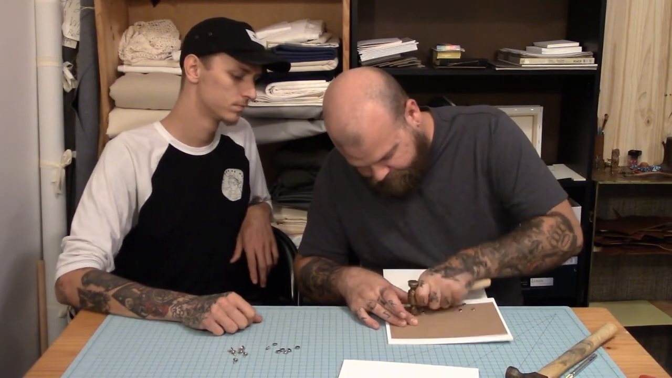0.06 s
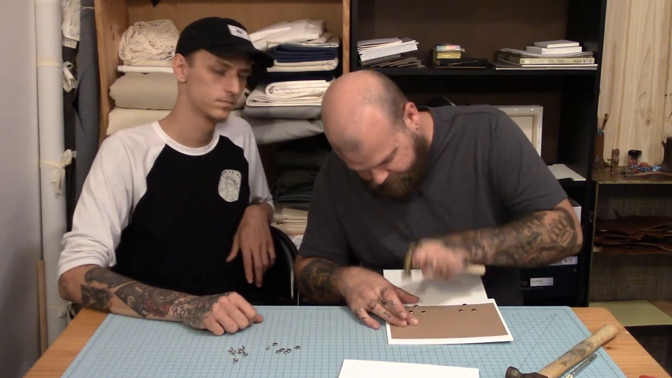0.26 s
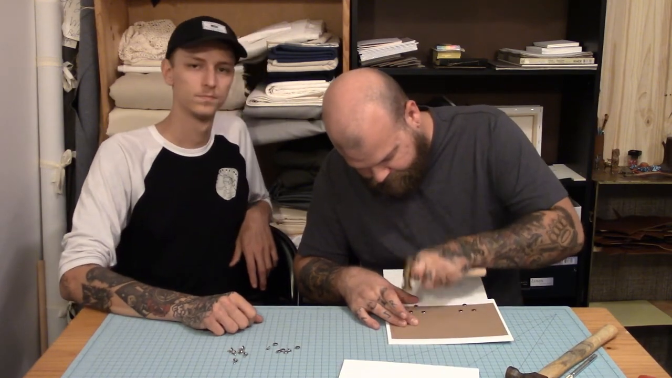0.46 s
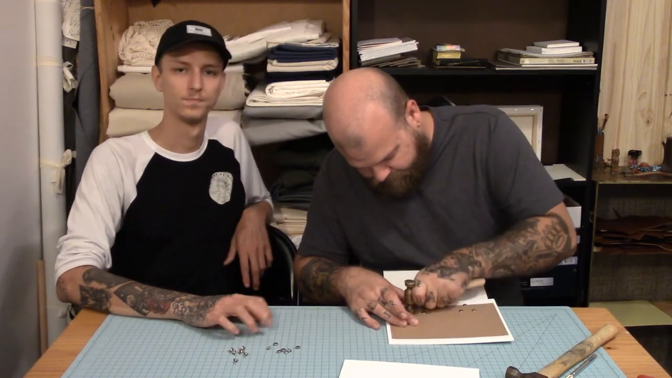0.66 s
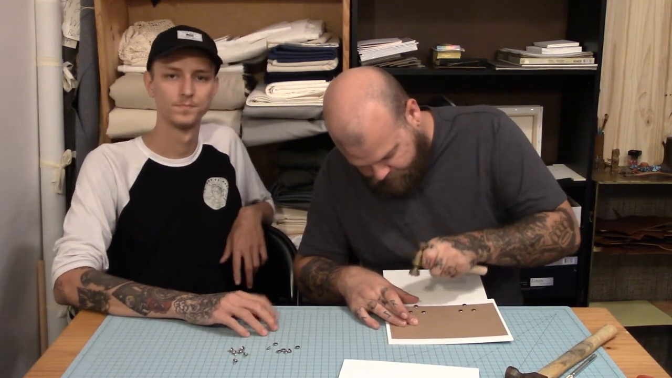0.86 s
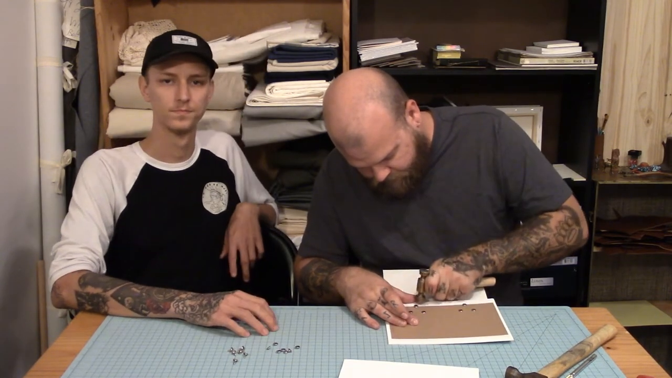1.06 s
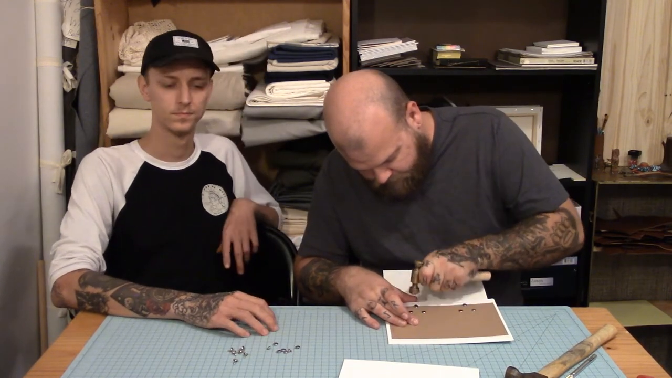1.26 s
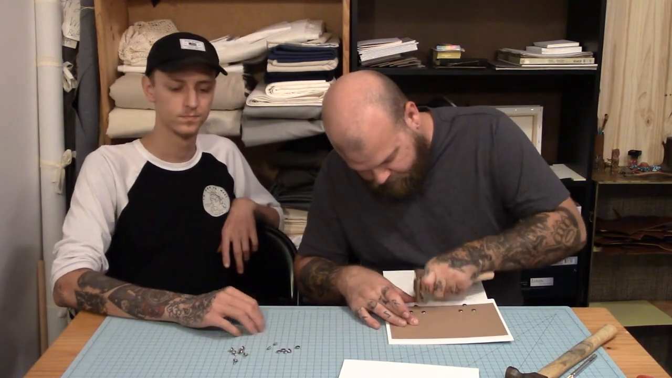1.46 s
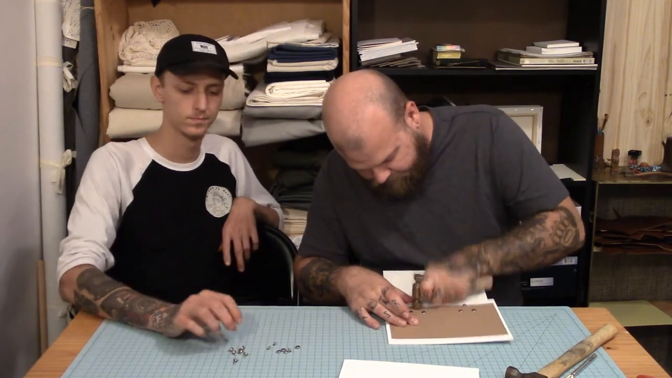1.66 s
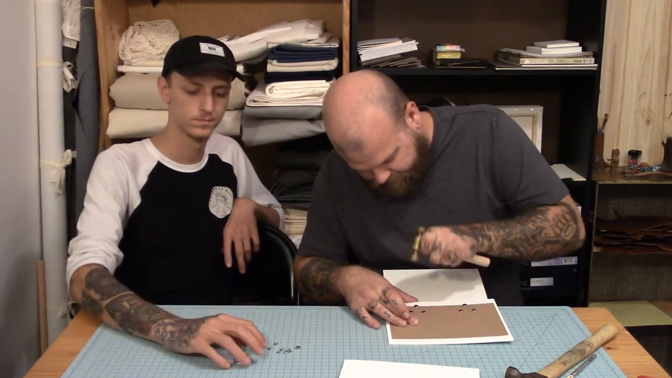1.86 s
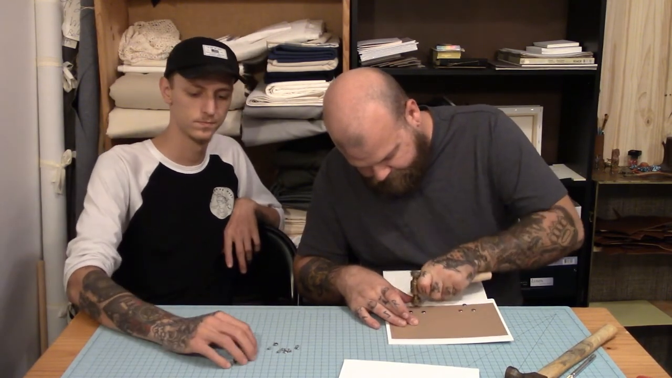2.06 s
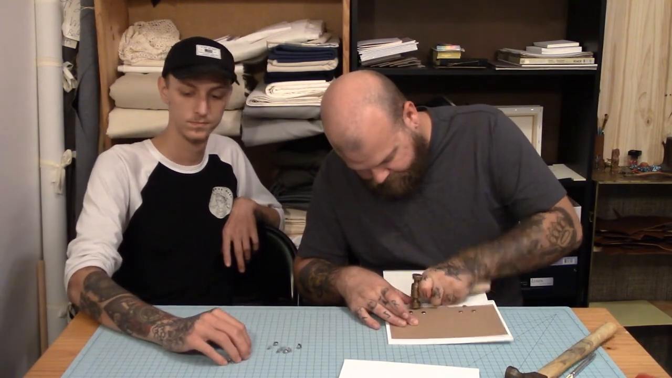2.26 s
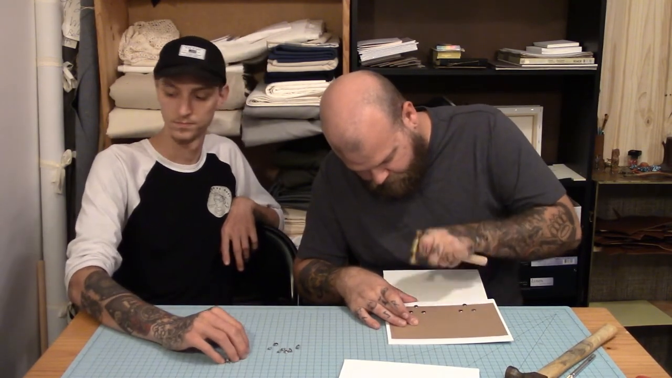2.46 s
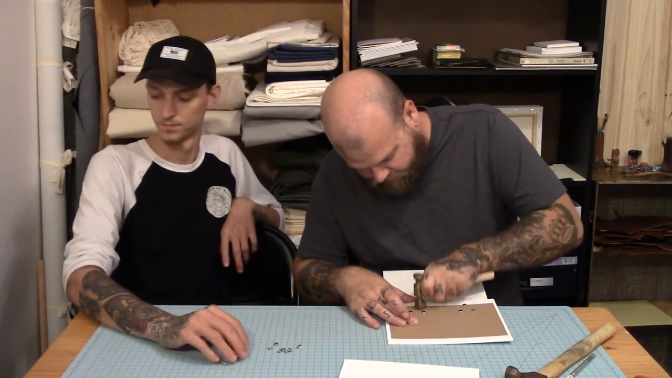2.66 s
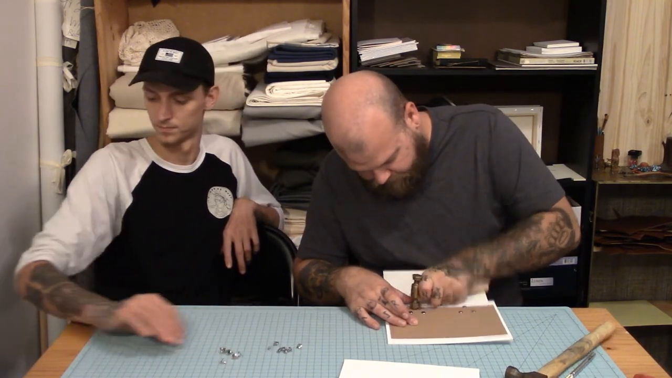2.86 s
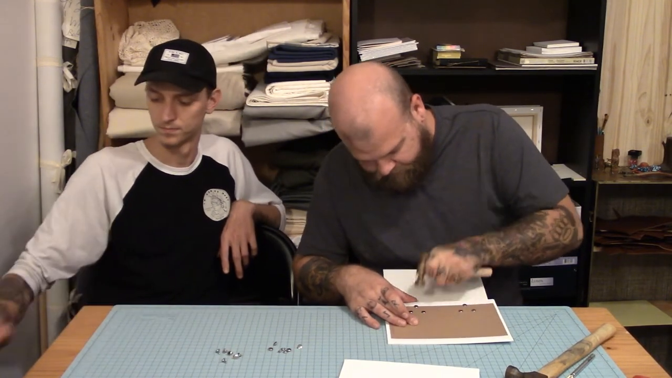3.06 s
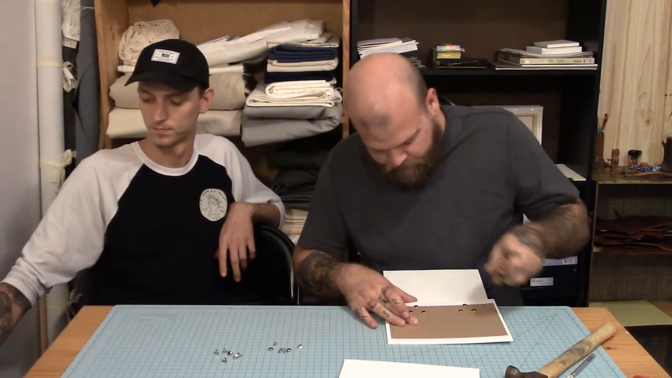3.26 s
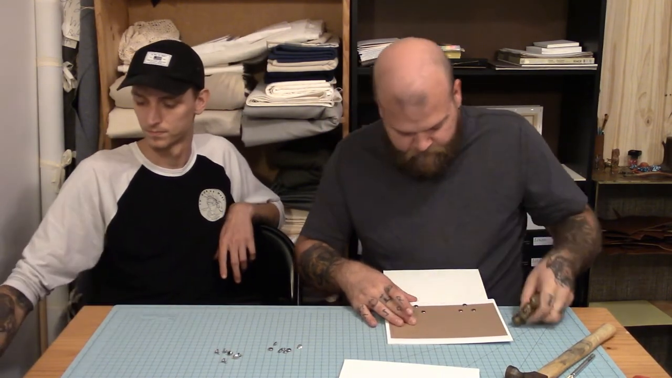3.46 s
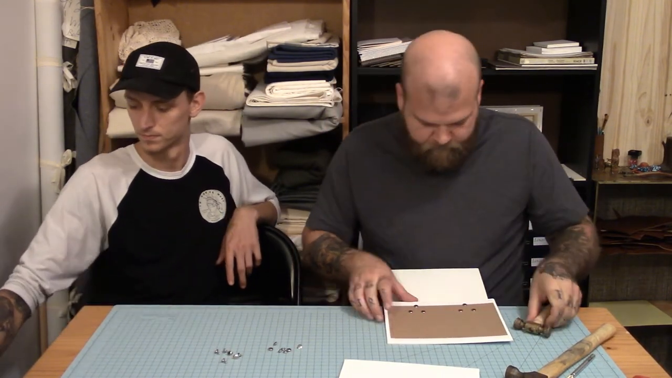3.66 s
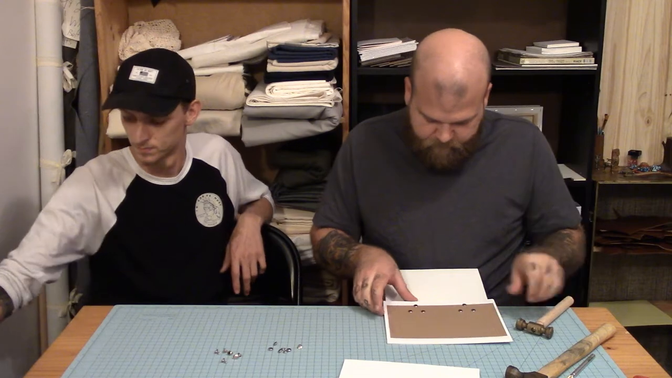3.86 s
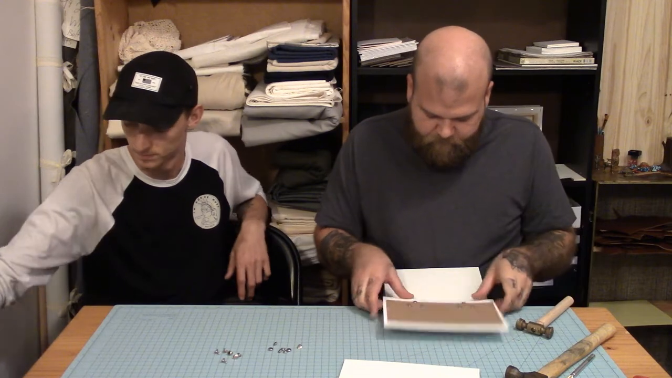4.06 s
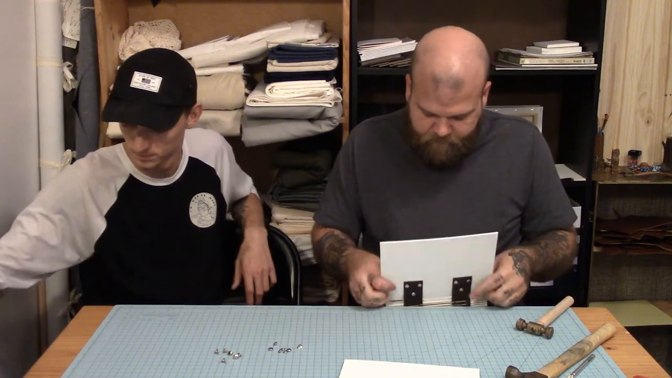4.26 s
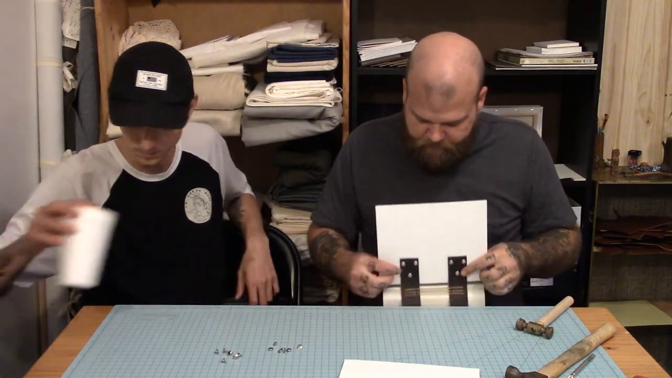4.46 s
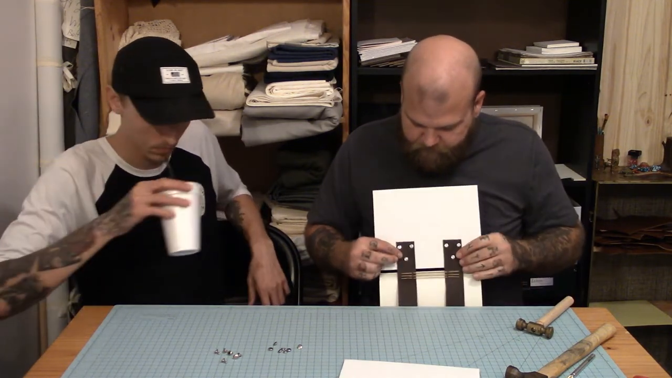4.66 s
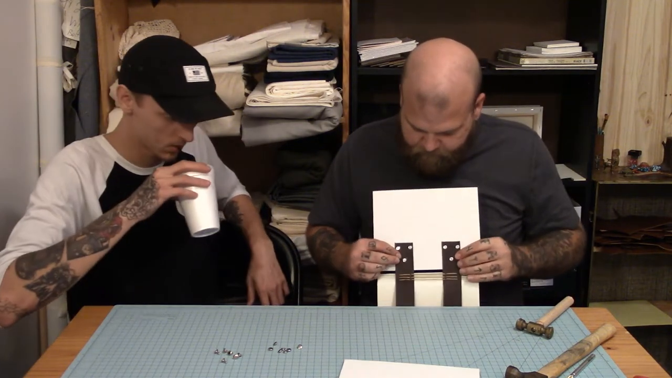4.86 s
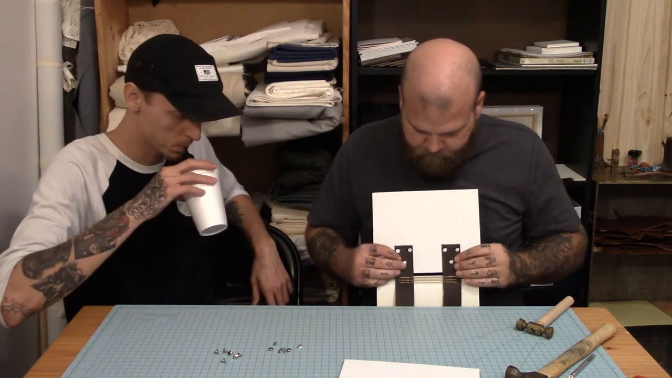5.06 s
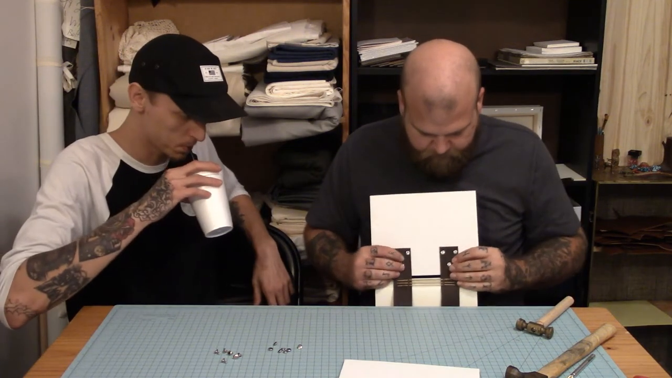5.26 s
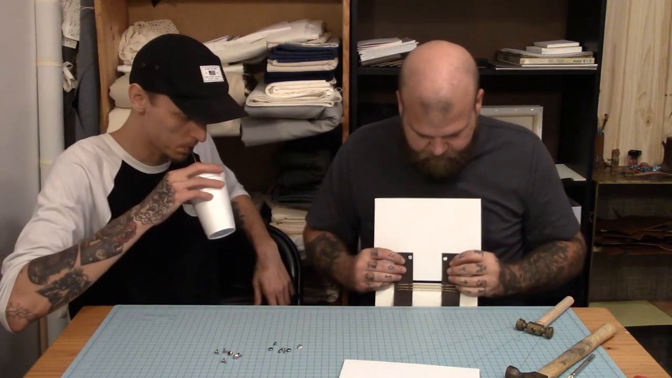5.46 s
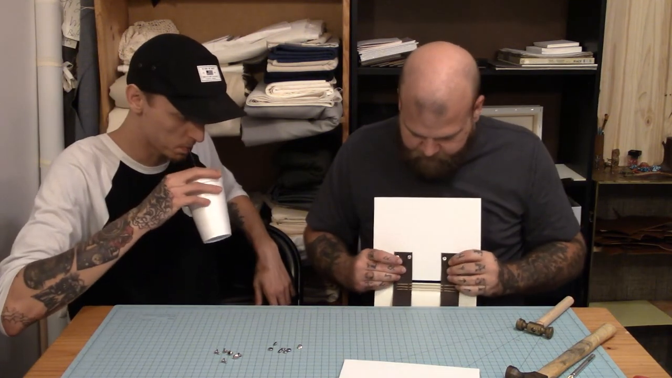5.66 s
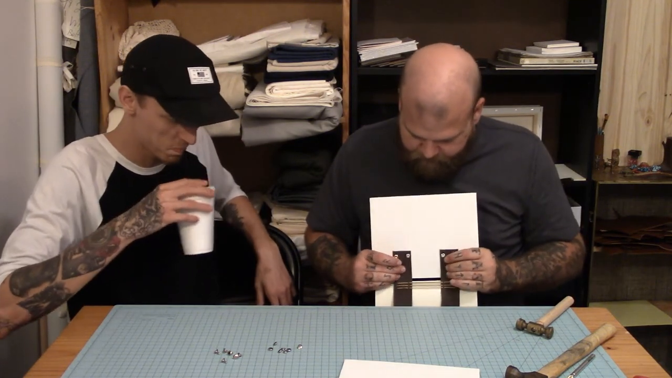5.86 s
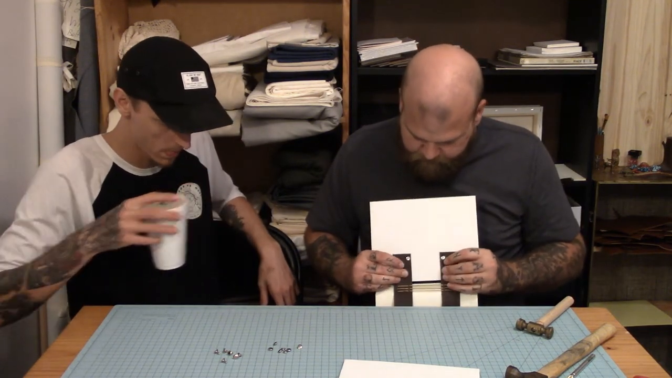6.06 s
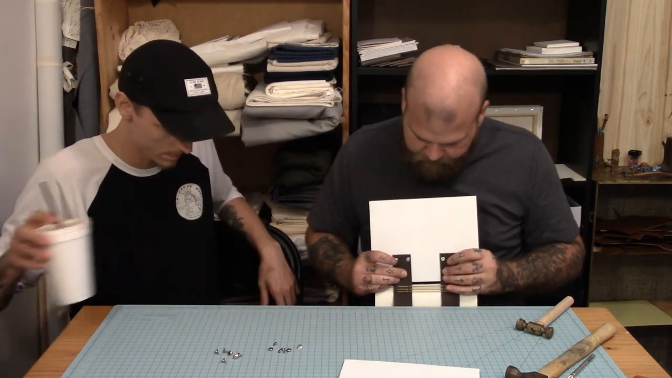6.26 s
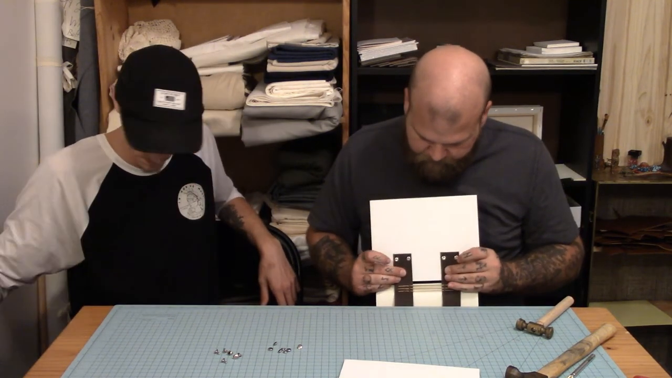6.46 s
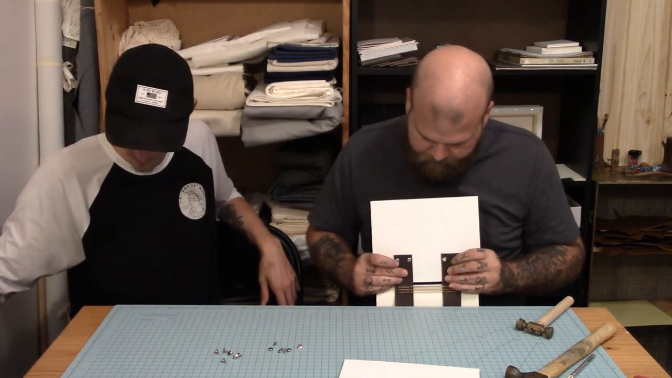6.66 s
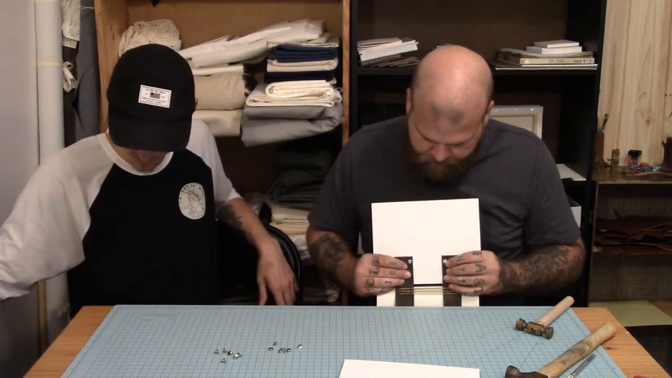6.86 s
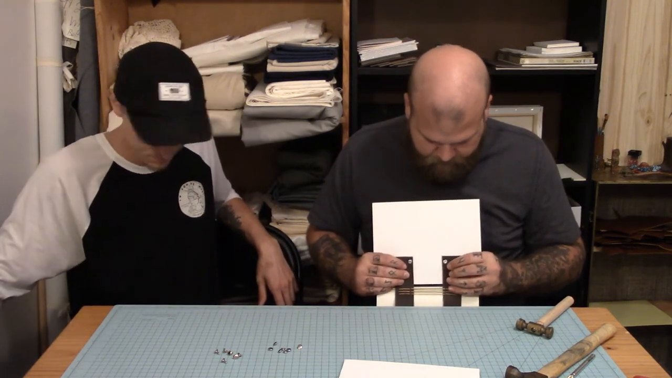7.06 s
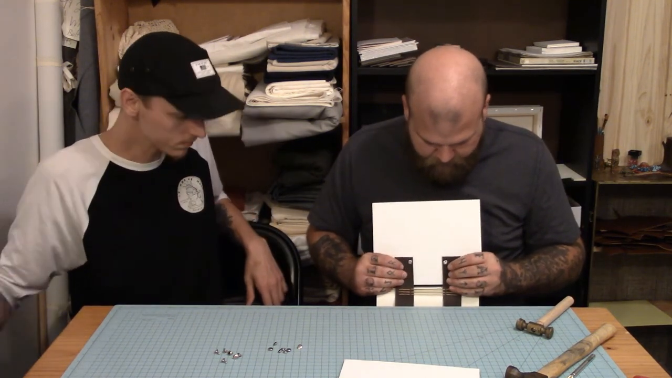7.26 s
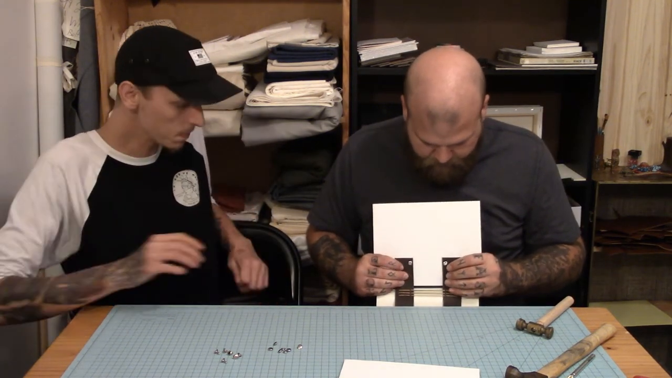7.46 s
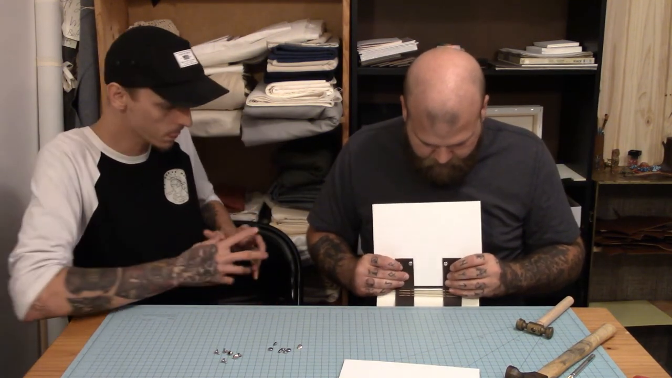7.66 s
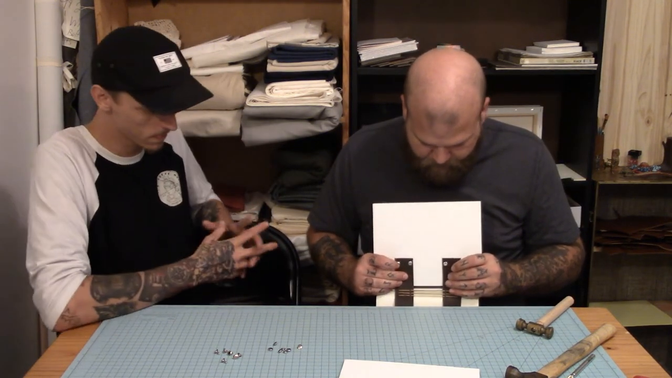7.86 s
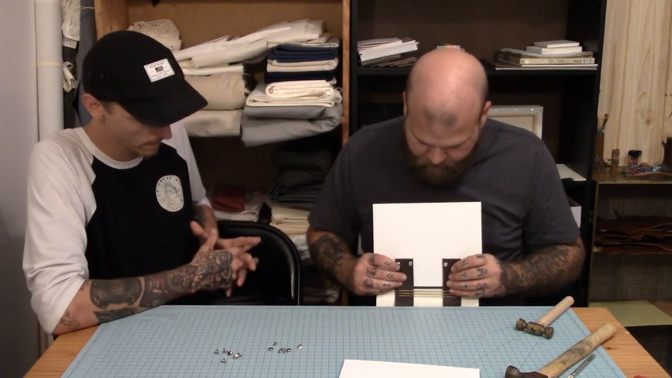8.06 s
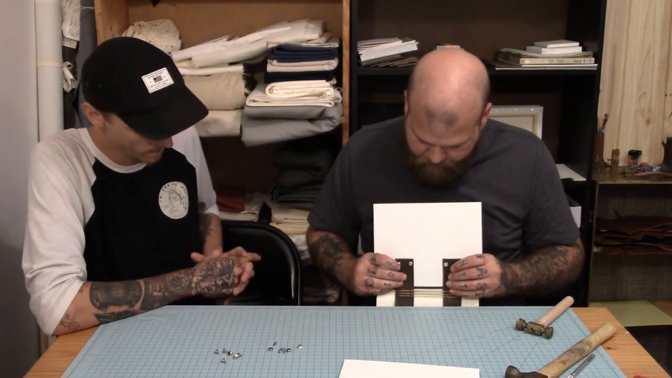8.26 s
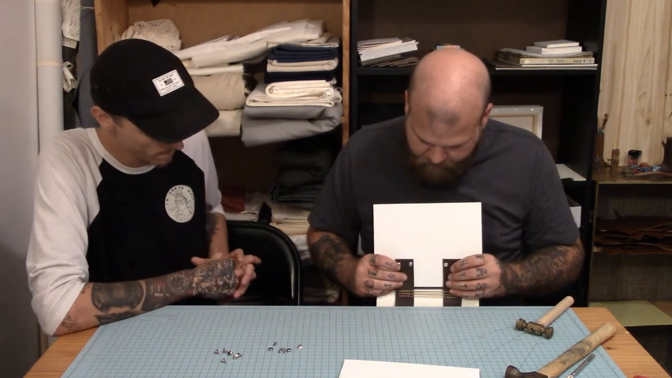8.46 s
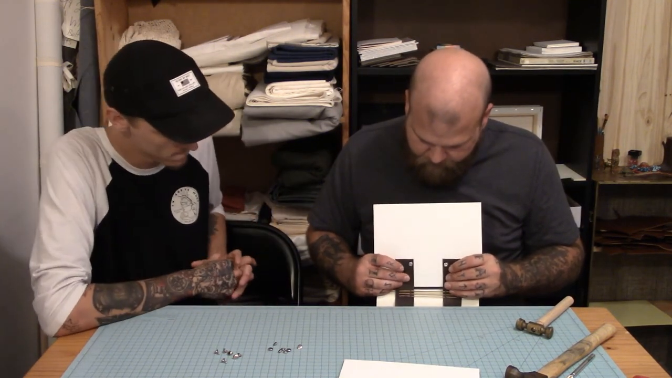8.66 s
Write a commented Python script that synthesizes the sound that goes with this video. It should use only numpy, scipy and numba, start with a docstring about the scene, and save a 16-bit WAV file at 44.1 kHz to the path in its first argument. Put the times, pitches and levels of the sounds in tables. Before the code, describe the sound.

Hard, clipped hammer blows crack on a wooden worktable with rattling rivets, then stop, leaving faint card rustles, dull knocks and small ticks in a room.

```python
"""Hard mallet blows drive rivets into card on a wooden worktable, each one a crack and a short wooden ring. The
work piece lands and hops after each full swing, and loose rivets rattle. Then the mallet is laid down and the
card is handled: dull knocks, sliding friction, dry ticks and small ringing clinks. Blows and taps are shaped
pulses plus dying sines in a small room; friction and room tone are shaped noise. A fast limiter flattens the
loud blows into a plateau."""
import sys
import numpy as np
from scipy import signal
from scipy.io import wavfile
from scipy.ndimage import uniform_filter1d
from numba import njit

SR = 44100
rng = np.random.default_rng(int(sys.argv[2]) if len(sys.argv) > 2 else 0)


def int16_out(signal):
    """Quantize to a 16-bit WAV file."""
    q = np.round(np.clip(np.atleast_2d(signal).T, -1, 1) * 32767)
    wavfile.write(sys.argv[1], SR, q.astype(np.int16))


def ratio_of_db(decibels):
    """Turn decibels (scalar or array-like) into linear amplitude factors; 0 dB maps to 1."""
    return 10 ** (np.asarray(decibels, float) / 20)


N = 384552  # length of the scene in samples


# Full swings of the mallet. Each row: start in seconds, strength in dB before the limiter,
# contact stiffness as a factor on the crack's pitch, extra level of the wood's ring in dB.
FULL_SWINGS = [(-.008, 17, 0.95, 5.5), (0.286, 17.5, 0.89, 1.7), (0.5811, 16.5, 1, 7),
               (1.6516, 11, 1.15, 7.5), (1.9393, 19, 0.95, 0.5), (2.2428, 20, 1.04, -0.5),
               (2.5369, 18.5, 1.025, 2.8), (2.8448, 19, 0.96, 2)]
# How long the work piece is in the air after each swing. Each entry: time until it lands in seconds.
LANDING_DELAYS = [.055, .049, .047, .055, .063, .059, .049, .053]


def mallet_swings(mix):
    """Each full blow makes the work piece jump, land and hop once more, shorter and lighter."""
    for (start_s, strength_db, stiffness, ring_db), landing_s in zip(FULL_SWINGS, LANDING_DELAYS):
        add(mix, start_s, blow(strength_db, stiffness, -2, ring_db, -35))
        add(mix, start_s + landing_s, tick(strength_db - 15, 4200))
        add(mix, start_s + landing_s * 1.48, tick(strength_db - 28.5, 6500))


# Lighter contacts: an aiming tap, a glancing blow, then the mallet laid down in three bumps.
# Each row: start in seconds, strength in dB before the limiter, stiffness as a factor on the crack's pitch,
# treble tilt in dB per octave, extra level of the wood's ring in dB, relative level of the metal rattle in dB.
LIGHT_BUMPS = [(1.213, -7, 0.56, 4, -15.5, -22), (1.3742, 6, 0.54, 3.2, -10.5, -18),
               (3.4672, -4, 0.61, -4.5, 8, -30), (3.6162, -11.5, 0.73, -2, 7.5, -31),
               (3.7702, 0, 2.22, -5.5, 1, -28.5)]


def mallet_bumps(mix):
    """The lighter contacts work like the full blows, but without the jump of the work piece."""
    for start_s, *settings in LIGHT_BUMPS:
        add(mix, start_s, blow(*settings))


# Colour of the mallet's crack. Each row: frequency in Hz, relative level in dB.
CRACK_COLOUR = [(60, -48), (110, -9), (170, -8), (400, -1), (800, 5.5), (1500, -2), (2500, -10.5),
                (4000, -21), (6000, -29), (9000, -32.5), (12000, -44), (16000, -53)]
# Ways the card and mat vibrate under the mallet.
# Each row: frequency in Hz, relative level in dB, time to fall by 60 dB in seconds.
THUD_MODES = [(808, -4, 0.04), (570, -6.5, 0.035), (1221, -19, 0.034)]
# Ways the table top vibrates. Each row: frequency in Hz, relative level in dB, time to fall by 60 dB in seconds.
TABLE_MODES = [(193, -24, 0.06), (278.2, -1, 0.077), (318, -6, 0.21), (363, -3.5, 0.22),
               (431.4, 1.5, 0.094), (458, -10.5, 0.3), (533, 6, 0.051), (571, -0.5, 0.075),
               (641.6, 4.5, 0.09), (685, 0, 0.019), (779, 4.5, 0.11), (932, -8.5, 0.26), (1050, -7.5, 0.16),
               (1345, -21, 0.12), (1436, -14.5, 0.027)]


def blow(strength_db, stiffness, tilt_db, ring_db, rattle_db):
    """A short crack excites the card, mat and table top, and loose metal rattles; all sound in the room."""
    t = np.arange(int(.8 * SR)) / SR

    def crack_db(hz):
        # a stiffer contact moves the whole colour up in pitch
        return read(CRACK_COLOUR, hz / stiffness) + tilt_db * np.log2(hz / 800 + 1)

    crack = pulse(crack_db, len(t))
    thud = ratio_of_db(-17.0) * ring(THUD_MODES, t, spread_db=-5.0)
    table = ratio_of_db(-29.5) * ring(TABLE_MODES, t, spread_db=2.5)
    impact = crack + ratio_of_db(ring_db) * (thud + table)
    late_impact = np.pad(impact, (30, 0))[:len(t)]  # 30 samples behind the metal
    metal = ratio_of_db(rattle_db) * rattle(t)
    return ratio_of_db(strength_db) * (in_room(late_impact, wet_db=9.5) + in_room(metal, wet_db=9.5))


# Ways a rivet vibrates. Each row: frequency in Hz, relative level in dB, time to fall by 60 dB in seconds.
RIVET_MODES = [(4400, -4.5, .02), (4910, 5.5, 0.024), (6220, -4, 0.054), (8030, 0, 0.13),
               (8200, -12.5, 0.043)]


def rattle(t):
    """The metal clinks at the blow; loose rivets hop and land at random, softer as time goes on."""
    draw = rng.random(len(t))
    size = rng.exponential(1, len(t))
    landing_level = ratio_of_db(1.9 * np.minimum(size, 4) - 60 * t / 0.16)
    # about 120 landings a second, from 40 ms after the blow
    landings = (draw < 120 / SR) * landing_level * (t > .04)
    landings[0] = ratio_of_db(2.0)  # the first clink
    click = pulse(lambda hz: -7.0 * np.log2(hz / 4500 + 1e-3) ** 2, 6000)
    rivet_ring = ratio_of_db(-31) * ring(RIVET_MODES, t[:6000], spread_db=1.0)
    return signal.fftconvolve(landings, click + rivet_ring)[:len(t)]


# Light knocks of hands, cup and card.
# Each row: start in seconds, relative level in dB, pitch in Hz, level of the snap against the body in dB.
LIGHT_KNOCKS = [(3.221, -24, 394, 1), (3.925, -23.5, 430, 7), (4.268, -30.5, 410, 10),
                (4.424, -25, 405, -9), (4.587, -33, 957, 16.5), (4.845, -33, 318, 4),
                (5.001, -35.5, 447, 12.5), (5.172, -31, 600, 6.5), (5.671, -43, 780, 23),
                (5.5, -41.5, 380, 6), (5.697, -22.5, 418, 7), (5.8, -30, 740, 3), (5.826, -28, 434, -4),
                (6.002, -36, 727, 0), (6.275, -24.5, 440, 0), (6.535, -49.5, 600, 14),
                (6.843, -49, 856, 13), (7.149, -31.5, 760, -11), (7.172, -34, 620, -3),
                (7.29, -41.5, 620, -1), (7.658, -32, 228, -10)]


def knocks(mix):
    """Hands, cup and card touch the table lightly."""
    for start_s, *settings in LIGHT_KNOCKS:
        add(mix, start_s, knock(*settings))


# Colour of card friction and of a knock's snap. Each row: frequency in Hz, relative level in dB.
CARD_COLOUR = [(100, -39.5), (250, -7), (500, 2.5), (1000, -0.5), (2000, -4.5), (3200, -11), (5000, -22),
               (8000, -28), (12000, -42.5), (16000, -48.5)]


def knock(level_db, hz, snap_db):
    """A dull, quickly damped cluster of modes around one pitch, with a broad snap."""
    t = np.arange(int(.4 * SR)) / SR
    t60 = 0.055 * (400 / hz) ** 0.74  # higher knocks die sooner
    modes = [(hz, 0, t60), (1.0 * hz, -5, 0.67 * t60), (0.634 * hz, -14, t60), (3.7 * hz, -8, 0.36 * t60)]
    soft_onset = 1 - np.exp(-t / 0.0014)
    body = ring(modes, t, spread_db=2.5) * soft_onset
    snap = pulse(lambda f: read(CARD_COLOUR, f), len(t))
    return ratio_of_db(level_db - 9.5) * in_room(body + ratio_of_db(snap_db) * snap, wet_db=2.0)


# Card and sleeves sliding, one stroke a row.
# Each row: start in seconds, length before the fade in seconds, relative level in dB,
# brightness as treble tilt in dB per octave.
SLIDING_STROKES = [(.85, 0.19, -51, 0.3), (1.15, 0.18, -47, -2), (3.1, .1, -52, -3.5),
                   (3.215, 0.054, -45.5, -3), (3.9, 0.09, -50.5, 0), (4.06, 0.22, -50, 4),
                   (4.265, .03, -44, 2), (4.315, .09, -37.5, 2.3), (4.45, 0.077, -46.5, 4),
                   (4.55, 0.057, -41, 4.5), (4.847, 0.02, -47, -9.5), (4.99, 0.092, -51.5, 1.5),
                   (5.165, .02, -50.5, -1), (5.33, .1, -56.5, 4), (5.668, 0.11, -47, 1.4),
                   (5.8, 0.032, -50.5, -2.5), (5.995, .02, -59, -3), (6.12, 0.035, -57, 5.5),
                   (6.265, 0.037, -39.5, 1.7), (6.6, 0.12, -60.5, 2.5), (6.835, 0.026, -50, -0.4),
                   (7.27, 0.04, -55.5, -4), (7.64, 0.061, -53.5, -3.5), (7.95, 0.082, -56.5, 4.5),
                   (8.3, 0.12, -48.5, 2.5), (8.62, 0.025, -54.5, 5)]


def sliding(mix):
    """Card and sleeves rub over the table, one stroke after another."""
    for start_s, *settings in SLIDING_STROKES:
        add(mix, start_s, stroke(*settings))


def stroke(length_s, level_db, tilt_db):
    """Friction is noise in clumps and grainy patches that swells, holds and fades."""
    t = np.arange(int((length_s + .4) * SR)) / SR

    def colour_db(hz, s):
        grains = rng.standard_normal((len(s), len(hz)))
        patches = uniform_filter1d(uniform_filter1d(grains, size=14, axis=0), size=4, axis=1)
        tilt = tilt_db * np.log2(hz / 1500 + 1 / 4)
        return read(CARD_COLOUR, hz) + tilt + 3 * evened(patches).T

    clumps = evened(uniform_filter1d(rng.standard_normal(len(t)), size=600))
    swell_db = -2 * np.maximum(1 - t / (0.47 * length_s), 0)
    fade_db = -146.5 * np.maximum(t - length_s, 0)  # dB per second
    return evened(noise(len(t), colour_db)) * ratio_of_db(level_db + swell_db + fade_db + 1.5 * clumps)


# Dry ticks of rivets, card and plastic. Each row: start in seconds, relative level in dB, pitch in Hz.
DRY_TICKS = [(.860, -35, 3784), (0.969, -33, 4560), (2.060, -14.5, 6150), (2.504, -34, 7000),
             (2.620, -8.5, 5100), (3.220, -34, 4050), (3.618, -24, 6130), (3.652, -32.5, 7000),
             (3.750, -24.5, 3970), (3.924, -30, 6000), (4.098, -35, 3620), (4.195, -33.5, 9000),
             (4.635, -31, 7450), (5.147, -32, 7970), (5.171, -18.5, 7650), (5.377, -33, 7870),
             (6.004, -37.5, 8960), (6.085, -34.5, 8470), (6.145, -28.5, 7750), (6.537, -33.5, 8100),
             (7.956, -39, 6000), (8.005, -33.5, 6840), (8.027, -24, 6500), (8.176, -32, 6660),
             (8.478, -25.5, 8000), (8.637, -35, 8900), (8.647, -29.5, 6500)]
# Small hard things touching with a clear ring: metal parts, and a finger ring or plastic near 3.5 kHz. Each
# row: start in seconds, relative level in dB, pitch in Hz, level of the ring against the click in dB.
RINGING_CLINKS = [(1.221, -14.5, 5330, -12), (1.946, 1.5, 7780, -11), (3.772, -39, 7400, -14),
                  (4.846, -47, 3580, 2), (5.172, -23, 3400, -17), (7.654, -47, 3580, 0)]


def ticks_and_clinks(mix):
    """Small hard things touch; a clink has a narrower click than a dry tick."""
    for start_s, *settings in DRY_TICKS:
        add(mix, start_s, tick(*settings))
    for start_s, *settings in RINGING_CLINKS:
        add(mix, start_s, tick(*settings, fall_db=32.5))


def tick(level_db, hz, ring_db=-23.5, fall_db=10.0):
    """A click, doubled by its bounce off the table top, with a brief ring; fall_db is one octave off pitch."""
    t = np.arange(int(.3 * SR)) / SR
    click = pulse(lambda f: -fall_db * np.log2(f / hz + 1e-3) ** 2, len(t))
    bounce_s = rng.uniform(.0003, 0.00058)
    click = click + 0.34 * np.roll(click, round(bounce_s * SR))
    clink = ring([(hz, 0, .03), (1.09 * hz, -8, .012), (.9 * hz, -8, .012)], t, spread_db=2)
    return ratio_of_db(level_db - 2.0) * in_room(click + ratio_of_db(ring_db) * clink, wet_db=2.0)


# Colour of the air noise. Each row: frequency in Hz, relative level in dB.
AIR_COLOUR = [(20, -25.5), (60, -15), (100, -17.5), (160, -6), (220, 2.5), (400, 1.5), (700, 0),
              (1200, -5.5), (2000, -6), (3000, -12), (5000, -15.5), (8000, -18), (12000, -20.5),
              (16000, -25)]
# Appliance drone. Each row: frequency in Hz, width in Hz, level in dB.
APPLIANCE_DRONE = [(114.2, 72, -61.5), (1542, 76, -65)]
# Air in a tilted cup hums faintly. Each row: time in seconds, level in dB.
CUP_HUM = [(5.05, -76), (5.2, -57), (5.5, -64), (5.65, -64.5)]


def room_tone():
    """Smooth air noise, an appliance's drone and the hum in the cup, the last two as narrow noise."""
    air = ratio_of_db(-57.5) * evened(noise(N, lambda hz, s: read(AIR_COLOUR, hz) + 0 * s, size=2048))
    drone = sum(ratio_of_db(db) * whistle(hz, width_hz) for hz, width_hz, db in APPLIANCE_DRONE)
    s, db = np.transpose(CUP_HUM)
    cup_db = np.interp(np.arange(N) / SR, s, db, -120, -120)  # practically silent outside the table
    return air + drone + ratio_of_db(cup_db) * whistle(360, width_hz=12)


def whistle(hz, width_hz):
    """A narrow resonance picks one pitch out of noise."""
    b, a = signal.iirpeak(hz, hz / width_hz, SR)
    return evened(signal.lfilter(b, a, rng.standard_normal(N)))


# How long the room rings. Each row: frequency in Hz, time to fall by 60 dB in seconds.
ROOM_DECAY = [(60, 0.39), (200, 0.29), (700, 0.29), (2000, 0.34), (6000, 0.3), (14000, 0.23)]


def in_room(x, wet_db):
    """Adds reflections: strong early ones off the table and shelves, then the room's dying tail."""
    t = np.arange(len(x)) / SR
    tail = noise(len(x), lambda hz, s: -60 * s / read(ROOM_DECAY, hz))
    onset = 1 - np.exp(-t / 0.00066)
    early_boost = 1 + 0.34 * np.exp(-t / 0.0023)
    tail = tail * onset * early_boost
    return x + ratio_of_db(wet_db) * signal.fftconvolve(x, tail / np.linalg.norm(tail))[:len(x)]


def ring(modes, t, spread_db):
    """Modes are dying sines; each contact excites them unevenly and shifts their pitch slightly."""
    total = 0
    for hz, db, t60 in modes:
        level_luck, pitch_luck = rng.standard_normal(2)
        envelope = ratio_of_db(db + spread_db * level_luck - 60 * t / t60)
        total = total + envelope * np.sin(2 * np.pi * hz * (1 + 0.00083 * pitch_luck) * t)
    return total


def pulse(shape_db, length):
    """The shortest causal (minimum-phase) pulse with the spectrum shape_db(hz), peak 1."""
    hz = abs(np.fft.fftfreq(4096, 1 / SR))
    log_gain = np.log(ratio_of_db(np.maximum(shape_db(hz), -100)))
    wave = np.fft.ifft(np.exp(np.conj(signal.hilbert(log_gain)))).real[:2048]
    return np.pad(wave / abs(wave).max(), (0, length - 2048))


def noise(length, shape_db, size=256):
    """Noise from random short-time spectra with the level shape_db(hz, s)."""
    hop = size // 4
    frames = length // hop + 8
    hz = np.fft.rfftfreq(size, 1 / SR)[:, None]
    a, b = rng.standard_normal((frames, len(hz), 2)).T
    spectra = (a + 1j * b) * ratio_of_db(shape_db(hz, np.arange(frames) * hop / SR))
    return signal.istft(spectra, nperseg=size, noverlap=size - hop)[1][:length]


def evened(x):
    """Scales to rms 1."""
    return x / np.sqrt(np.mean(x ** 2) + 1e-20)


def read(points, hz):
    """Reads a table on a log-frequency axis."""
    f, value = np.transpose(points)
    return np.interp(np.log(hz + 1), np.log(f + 1), value)


def add(mix, s, sound):
    """Mixes a sound in at time s, cutting what lies outside the scene."""
    at = round(s * SR)
    part = mix[max(at, 0):][:len(sound) + min(at, 0)]
    part += sound[max(-at, 0):][:len(part)]


def scene():
    """All sources at one microphone."""
    mix = room_tone()
    for source in (mallet_swings, mallet_bumps, knocks, sliding, ticks_and_clinks):
        source(mix)
    return mix[None]


@njit
def follow(size, ceiling, rise, fall):
    """Peak follower that never drops under the ceiling: quick up, slower down."""
    out, level = np.empty_like(size), ceiling
    for i in range(len(size)):
        level = level + rise * (size[i] - level) if size[i] > level else max(level * fall, ceiling)
        out[i] = level
    return out


def amplifier_noise():
    """Low amplifier noise, strongest in the bass."""
    colour = noise(N, lambda hz, s: -5.0 * np.log2(hz / 105 + 1 / 16) ** 2 + 0 * s, size=2048)
    return ratio_of_db(-80) * evened(colour)


def band_limit(x):
    """A steep low-pass at the top of the band."""
    return signal.sosfilt(signal.butter(12, 16000, fs=SR, output="sos"), x)


def record(dry):
    """Fast limiter, soft clipping of what slips past it, band limits and low amplifier noise."""
    ceiling, attack_s, release_db_per_s = ratio_of_db(-6.5), .003, 280
    level = follow(abs(dry[0]), ceiling, 1 / (attack_s * SR), ratio_of_db(-release_db_per_s / SR))
    held = dry * ceiling / level
    clipped = held / (1 + held ** 6) ** (1 / 6)
    rumble_cut = signal.butter(3, 184.5, "high", fs=SR, output="sos")
    treble_cut = signal.butter(2, 9500, fs=SR, output="sos")
    filtered = signal.sosfilt(treble_cut, signal.sosfilt(rumble_cut, clipped))
    finished = np.clip(filtered + amplifier_noise(), -1, 1)
    return band_limit(finished)


dry = scene()
out = record(dry)
int16_out(out)
```